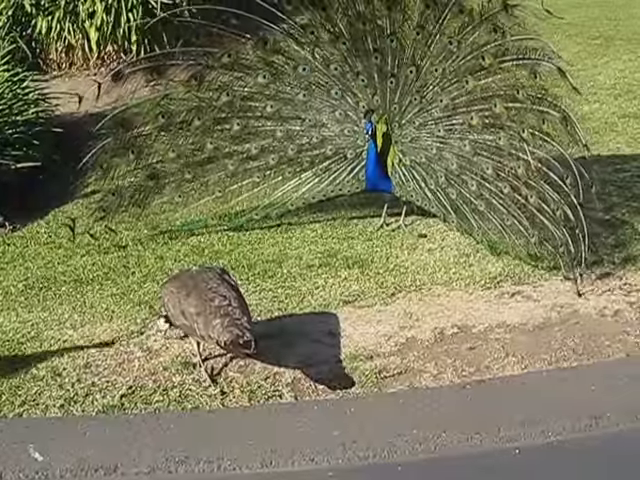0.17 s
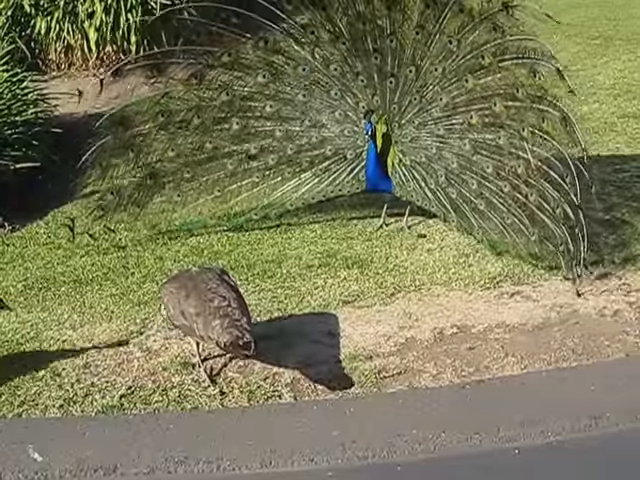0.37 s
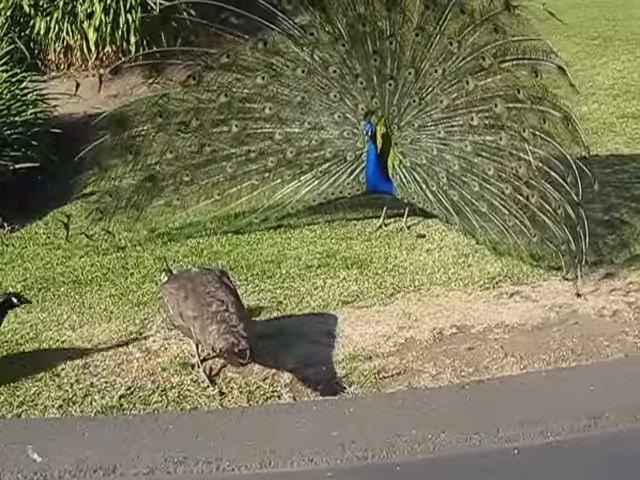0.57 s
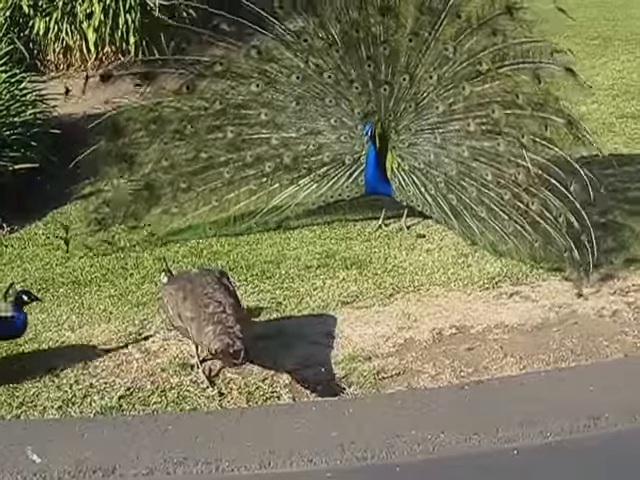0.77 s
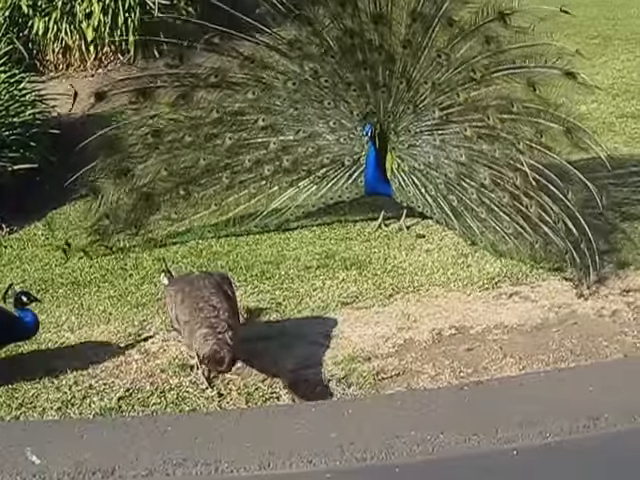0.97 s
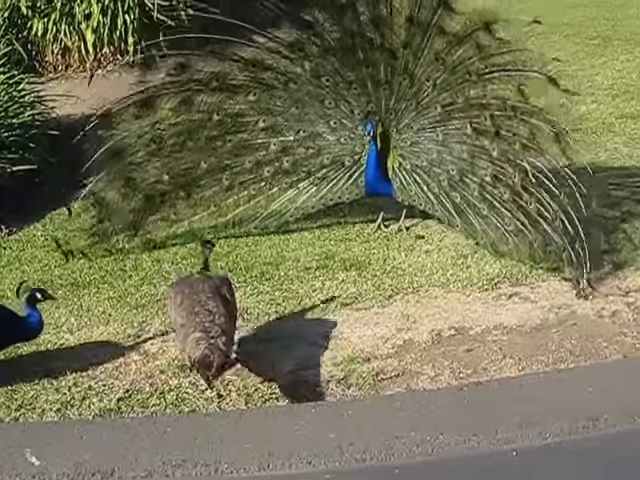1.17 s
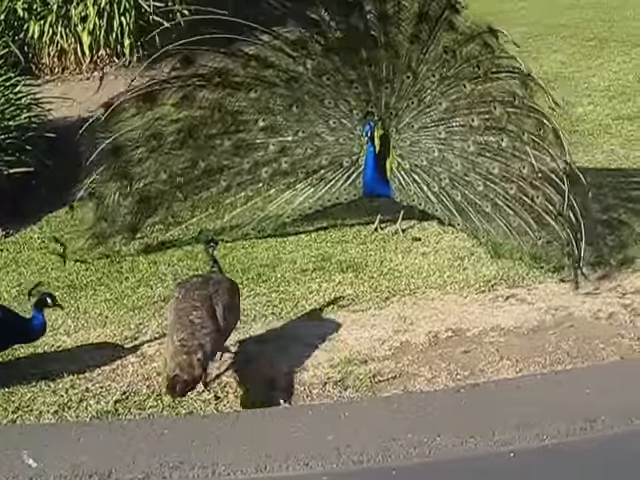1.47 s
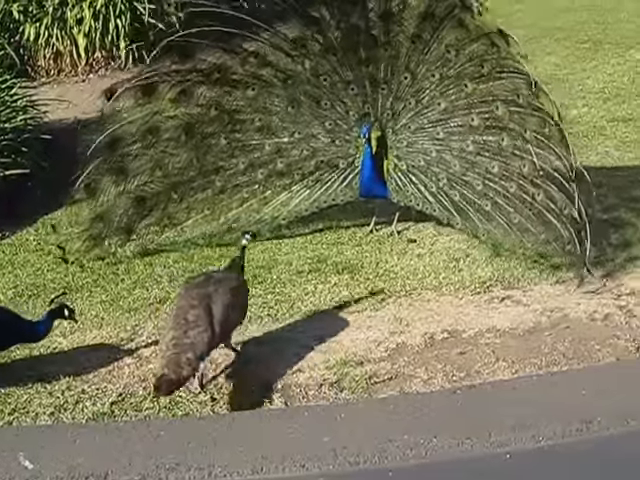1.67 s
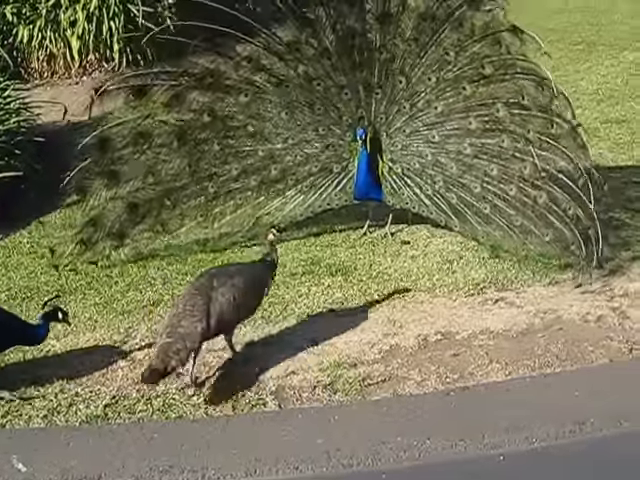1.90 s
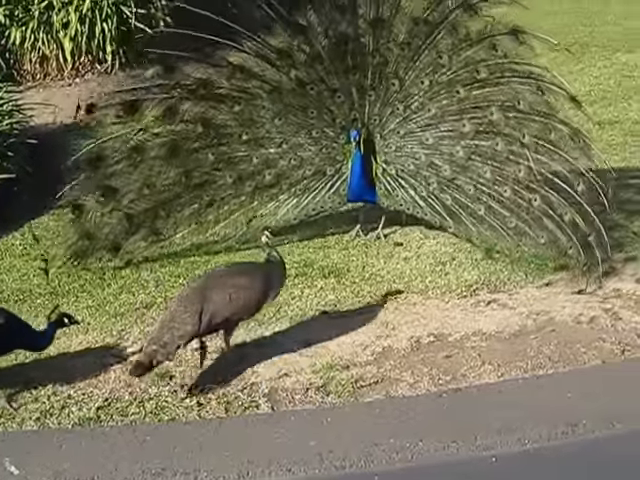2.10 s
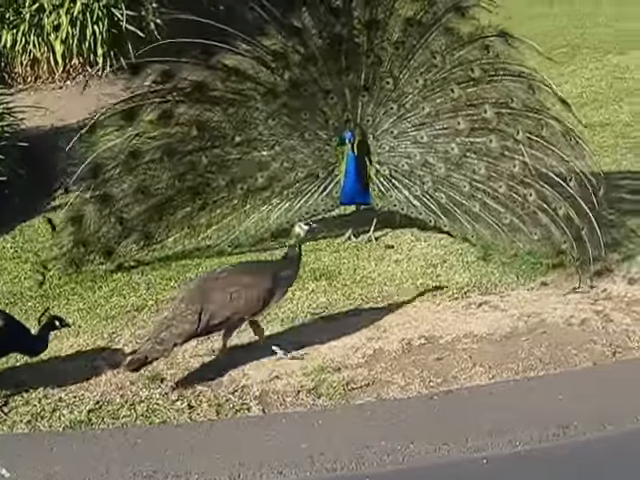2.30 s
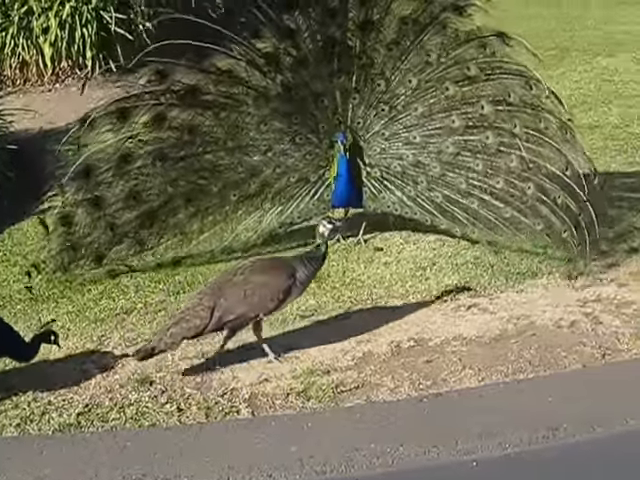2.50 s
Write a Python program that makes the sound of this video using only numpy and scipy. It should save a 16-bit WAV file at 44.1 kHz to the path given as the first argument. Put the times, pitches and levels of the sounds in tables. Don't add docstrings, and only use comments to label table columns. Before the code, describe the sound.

A peacock's raised tail feathers rustle and clatter in three quivering swells, with taps and knocks of quills; a small bird chirps in short falling notes, pauses, then resumes. Open lawn, faint distant traffic, boxy camera microphone.

```python
import sys
import numpy as np
from scipy import signal
from scipy.fft import rfft, irfft
from scipy.io import wavfile

SR = 44100
rng = np.random.default_rng(int(sys.argv[2]) if len(sys.argv) > 2 else 0)


def digitize_waveform(pressure):
    field = np.atleast_2d(pressure).T
    bounded = np.clip(field, -1, 1)
    quanta = np.round(bounded * 32767).astype(np.int16)
    wavfile.write(sys.argv[1], SR, quanta)


def volts_from_db(level):
    exponent = np.asarray(level, float) / 20
    return 10 ** exponent


N = 116865

# centre in Hz, width in Hz, lift in dB.
HOUSING = [(894, 466, 12), (1596, 440, 6), (2850, 590, 9), (3740, 760, 7), (4530, 310, 4), (5340, 175, 6),
           (5950, 840, 5.5), (7800, 310, 2), (9100, 1400, 2.5)]
# frequency in Hz, density in dB per Hz.
CLATTER = [(300, -32), (2000, -2), (6000, -1), (11000, -3), (15500, -8.5)]


def colour(x, points, peaks=(), size=2048):
    f = np.maximum(np.arange(size // 2 + 1) * SR / size, 1)
    p = np.array(points)
    gain_db = np.interp(np.log(f), np.log(p[:, 0]), p[:, 1])
    for hz, width, lift_db in peaks:
        gain_db = gain_db + lift_db / (1 + (2 * (f - hz) / width) ** 2)
    cepstrum = irfft(np.log(volts_from_db(gain_db)))
    causal = np.r_[cepstrum[0], 2 * cepstrum[1:size // 2], np.zeros(size // 2)]
    response = irfft(np.exp(rfft(causal)))
    return signal.fftconvolve(x, response)[:N]


def unit(x):
    return x / np.sqrt(np.mean(x ** 2))


def walk(rate):
    low_pass = signal.butter(2, rate, fs=SR, output="sos")
    return unit(signal.sosfilt(low_pass, rng.standard_normal(N + SR))[SR:])


def ticks(rate, scatter_db):
    hit = rng.random(N) < rate / SR
    size = rng.exponential(size=N)
    sign = rng.choice([-1., 1.], N)
    return unit(hit * sign * volts_from_db(scatter_db * size))


def impulses(events, gain_db):
    hits = np.zeros(N)
    hits[[int(s * SR) for s, db in events]] = [volts_from_db(db + gain_db) for s, db in events]
    return hits


def park(t):
    # frequency in Hz, density in dB per Hz.
    park_colour = [(15, -32), (30, -18), (85, -5.5), (180, -13), (550, -17), (920, -13.5), (5900, -23.5),
                   (15500, -38)]
    level_db, hum_hz, hum_db, hum_wobble_db = -37.5, 119, -45.5, 1
    noise = rng.standard_normal(N) * volts_from_db(0.28 * walk(1.9))
    far = colour(noise, park_colour, [(896, 700, 8.3), (2300, 770, 5.7)], size=8192)
    hum = np.sin(2 * np.pi * (hum_hz * t + 0.15 * walk(4.9))) * volts_from_db(hum_wobble_db * walk(7.5))
    return volts_from_db(level_db) * unit(far) + volts_from_db(hum_db) * unit(hum)


def echo(x):
    echo_db, t60_s, lag_s = -11.5, 0.4, .012
    lag = np.arange(SR // 2) / SR
    decay = (lag > lag_s) * volts_from_db(-60 * lag / t60_s)
    blur = unit(rng.standard_normal(len(lag)) * decay) / np.sqrt(len(lag))
    return volts_from_db(echo_db) * signal.fftconvolve(x, blur)[:N]


def bird(t):
    # middle in seconds, level in dB, pitch in Hz, half-length in seconds, fall in
    # Hz per ms.
    notes = [(.003, -28.5, 2485, 0.02, 34), (0.022, -26, 2240, .007, 18), (0.032, -23, 2240, 0.0057, -8),
             (0.054, -21.5, 2136, 0.015, 8), (0.073, -21, 2126, 0.0077, 10),
             (0.081, -21.5, 2215, 0.0049, -10), (0.164, -20.5, 2155, 0.012, 8),
             (0.177, -31, 2620, 0.0055, 34), (0.184, -21, 2220, 0.01, 17), (0.193, -33, 2720, 0.0051, 38),
             (0.197, -28.5, 2290, 0.0088, -6), (0.228, -19, 2158, 0.011, 8),
             (0.246, -20, 2127, 0.0093, 31), (0.26, -30, 2350, 0.01, 5), (.280, -33, 2180, .008, 8),
             (.302, -33, 2200, .007, 15), (.341, -20.5, 2123, 0.012, 12), (0.359, -19.5, 2196, 0.011, 14),
             (0.373, -22.5, 2268, 0.016, -9.5), (0.402, -33, 2600, 0.0051, 27),
             (0.415, -20.5, 2157, 0.011, 17), (0.434, -21, 2220, 0.011, 12),
             (0.442, -27.5, 2700, 0.005, 40), (.449, -31.5, 2570, 0.009, 5),
             (.470, -36, 2180, 0.0087, 11),
             (0.529, -29.5, 2300, 0.0079, 5), (0.537, -26, 2330, 0.0086, 3),
                        (.544, -29, 2520, 0.0054, 10), (0.557, -20, 2300, 0.0039, 6),
                        (0.577, -33, 2300, 0.029, 3.5), (.610, -19, 2152, .012, 4.8),
                        (0.626, -20.5, 2230, 0.011, 4.8), (0.65, -28, 2360, 0.016, 3.9),
                        (0.733, -21.5, 2180, 0.014, 18), (0.752, -21, 2310, .009, 12),
                        (.767, -32, 2400, 0.0057, 15), (0.779, -24.5, 2300, 0.0098, 3),
                        (0.808, -20, 2040, 0.012, 22), (0.826, -19, 2150, 0.011, 12),
                        (0.939, -23.5, 2170, 0.011, 14), (.957, -21.5, 2150, 0.0098, 26),
                        (0.979, -23, 2300, .007, 10), (1.024, -23, 2174, 0.014, 12),
                        (1.045, -24, 2220, 0.017, 14),
             (1.168, -22.5, 2185, 0.012, 11), (1.186, -22, 2216, 0.011, 10),
                  (1.202, -26.5, 2356, 0.013, 5), (1.242, -24, 2076, 0.015, 7),
                  (1.261, -22, 2220, 0.0084, 10), (1.275, -31, 2590, .014, -6),
                  (1.363, -23, 2205, .013, 14), (1.381, -24, 2355, 0.0065, 2),
                  (1.389, -25, 2320, 0.0091, 2), (1.401, -23, 2390, 0.0047, 5),
                  (1.411, -26, 2360, 0.0081, 10), (1.442, -21, 2092, 0.016, 10),
                  (1.464, -20.5, 2300, 0.0039, -19), (1.480, -37, 2480, 0.011, 7),
                  (1.52, -39, 2380, .01, 2), (1.552, -41, 2330, .012, -2),
             (2.056, -24, 2125, .011, 19), (2.076, -24.5, 2290, 0.011, 30),
                   (2.128, -19.5, 2080, 0.014, 15), (2.146, -19.5, 2150, 0.011, 26),
                   (2.159, -26.5, 2350, 0.019, -2), (2.242, -26, 2200, .012, 20),
                   (2.256, -27, 2320, .006, 3), (2.263, -24, 2220, 0.0064, 10),
                   (2.272, -24, 2460, 0.011, -10), (2.289, -21, 2420, 0.011, 7),
                   (2.301, -22, 2430, 0.0044, 15), (2.318, -20, 2080, 0.013, 4),
                   (2.331, -19.5, 2170, 0.012, -14), (2.343, -25, 2270, 0.0044, -8),
                   (2.363, -28.5, 2480, 0.0092, -20), (2.504, -22, 2160, 0.011, 2),
                   (2.529, -26, 2300, 0.017, -6), (2.55, -25.5, 2300, .009, 10),
                   (2.570, -27, 2180, .008, 10), (2.589, -25, 2300, .006, 6), (2.601, -24, 2280, 0.008, 8),
                   (2.617, -20, 2200, 0.01, 25), (2.632, -19, 2230, 0.0082, -4),
                   (2.641, -26, 2215, .005, 2), (2.590, -31, 2850, .006, 35), (2.631, -28, 2710, .005, 30),
                   (2.645, -31, 2680, .006, 20)]
    quaver_hz, quaver_db, roundness = 23, 0.8, 1.36
    drift = np.cumsum(quaver_hz * walk(155)) / SR
    flutter = volts_from_db(quaver_db * walk(140))
    song = np.zeros(N)
    for at, db, hz, length, fall in notes:
        near = slice(max(int((at - length) * SR), 0), int((at + length) * SR))
        u = t[near] - at
        shape = np.cos(np.pi / 2 * np.clip(u / length, -1, 1)).clip(0) ** roundness
        cycles = hz * u - fall * 1000 * u ** 2 / 2 + drift[near]
        song[near] += volts_from_db(db) * 1.1 * shape * np.sin(2 * np.pi * cycles)
    song = song * flutter
    return song + echo(song)


def tip_taps(t):
    # time in seconds, level in dB.
    tap_events = [(0.0012, -41), (0.015, -39), (0.0344, -38), (0.0771, -41), (0.1193, -38), (0.1848, -44),
                  (0.2459, -44), (0.2661, -45), (0.2849, -42), (0.3265, -41), (0.3431, -39), (0.3671, -38),
                  (0.3926, -39), (0.4683, -37), (0.4813, -39), (0.5164, -32), (0.6679, -28), (0.6883, -28),
                  (0.7272, -31), (0.8147, -24), (0.8865, -27), (1.0152, -28), (1.049, -26), (1.1077, -29),
                  (1.1533, -30), (1.201, -34), (1.2127, -36), (1.2766, -42), (1.315, -39), (1.3973, -36),
                  (1.4204, -43), (1.4851, -42), (1.5255, -38), (1.6005, -42), (1.7222, -46), (1.7541, -42),
                  (1.7786, -38), (1.8427, -31), (1.8728, -32), (1.9158, -26), (1.9739, -34), (2.0294, -26),
                  (2.2, -28), (2.2675, -28), (2.28, -30), (2.3125, -28.5), (2.3779, -35), (2.4183, -34),
                  (2.4811, -31), (2.5455, -33), (2.6166, -31), (2.6403, -28)]
    # frequency in Hz, density in dB per Hz.
    tap_colour = [(1000, -30), (4000, -9), (9000, -3), (15500, -6)]
    width_s, gain_db = .0028, -4.5
    bell = np.exp(-((t[:600] - t[300]) / width_s) ** 2)
    burst = np.convolve(impulses(tap_events, gain_db), bell)[300:N + 300]
    return burst * unit(colour(rng.standard_normal(N), tap_colour, HOUSING))


def shaft_bumps(t):
    # start in seconds, peak in dB.
    bump_events = [(.654, -26), (.768, -26), (.799, -21), (.897, -22), (.965, -24), (1.014, -31),
                   (1.069, -25), (1.35, -31), (1.93, -28), (1.99, -24), (2.032, -29), (2.079, -21),
                   (2.148, -22), (2.184, -21)]
    ring_hz, ring_s, gain_db = 950, .0035, -3
    out = np.zeros(N)
    detune = 0.065 * rng.standard_normal(len(bump_events))
    for (at, db), off in zip(bump_events, detune):
        u = (t - at).clip(0)
        envelope = np.e * u / ring_s * np.exp(-u / ring_s)
        out += volts_from_db(db + gain_db) * envelope * np.sin(2 * np.pi * ring_hz * (1 + off) * u)
    return out


def hard_knocks(t):
    # time in seconds, peak in dB.
    knock_events = [(0.515, -24), (0.5771, -22), (0.5914, -21.5), (0.6673, -13), (0.687, -23),
                    (0.7294, -22), (0.8154, -26), (0.847, -12), (0.8874, -14), (1.1564, -30), (1.3966, -25),
                    (1.843, -24), (1.9304, -26), (1.9724, -20), (2.0924, -20), (2.1504, -15)]
    length_s, gain_db = 0.0046, -4
    grit = t / length_s * np.exp(-3 * t / length_s) * rng.standard_normal(N)
    smear = colour(grit, CLATTER, HOUSING)[:400]
    return np.convolve(impulses(knock_events, gain_db), smear / abs(smear).max())[:N]


def quill_rustle(swing):
    # frequency in Hz, density in dB per Hz.
    quill_colour = [(150, -14.5), (550, -13.5), (800, -7.5), (2300, -5.5), (4000, -8.5), (7000, -11.5),
                    (10000, -13.5), (15500, -31.5)]
    ticks_per_s, scatter_db, swish_db = 9000, 2.2, -1.5
    fine = ticks(ticks_per_s * swing, scatter_db) + volts_from_db(swish_db) * rng.standard_normal(N)
    return unit(colour(swing * fine, quill_colour, HOUSING))


def snap_clatter(t, swing, crowd):
    snaps_per_s, scatter_db, bunching, decay_s = 900, 1.4, 1.2, .0008
    snaps = ticks(snaps_per_s * crowd ** 2 * swing ** bunching, scatter_db)
    envelope = np.convolve(abs(snaps), np.exp(-t[:400] / decay_s))[:N]
    return unit(colour(envelope * rng.standard_normal(N), CLATTER, HOUSING))


def train(t):
    # time in seconds, shake effort in dB, crisp clatter in dB relative to the rustle.
    shake = [(0, -41, -7), (.22, -53, 3), (.44, -46, -18), (.505, -39.5, -4), (.52, -36, -17),
             (0.619, -31.5, -10.5), (.74, -28, -8.5), (.98, -27, -9.5), (1.139, -32, -5),
             (1.175, -37.5, -2), (1.41, -37.5, -4), (1.44, -41, -11), (1.7, -48, -8), (1.81, -34, -19),
             (1.96, -30, -9.5), (2.05, -29, -8.5), (2.13, -28, -14.5), (2.38, -38, -7), (2.5, -32.5, -15)]
    shake_hz, depth_db, wander, train_db = 25.6, .8, .025, 4
    patchy_db, patchy_hz = .8, 70
    crowding, calm_db = .45, -40
    at, effort_db, crisp_db = np.array(shake).T
    effort_db = np.interp(t, at, effort_db)
    phase = 2 * np.pi * np.cumsum(shake_hz * (1 + wander * walk(2.4))) / SR
    crowd = volts_from_db(crowding * (effort_db - calm_db).clip(0))
    pulse_db = depth_db * np.cos(phase) / np.sqrt(crowd)
    swing = volts_from_db(pulse_db + patchy_db * walk(patchy_hz) / crowd)
    clatter = volts_from_db(np.interp(t, at, crisp_db)) * snap_clatter(t, swing, crowd)
    return (quill_rustle(swing) + clatter) * volts_from_db(train_db + effort_db)


def scene():
    t = np.arange(N) / SR
    peacock = tip_taps(t) + shaft_bumps(t) + hard_knocks(t) + train(t)
    return (park(t) + bird(t) + peacock)[None]


def roll_off(x):
    return signal.sosfilt(signal.butter(12, 15980, fs=SR, output="sos"), x)


def record(dry):
    low_pass = signal.ellip(16, .2, 80, 15745, fs=SR, output="sos")
    return roll_off(signal.sosfilt(low_pass, dry))


dry = scene()
out = record(dry)
digitize_waveform(out)
```